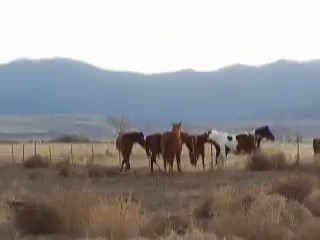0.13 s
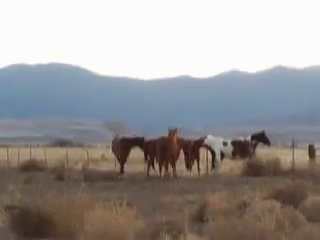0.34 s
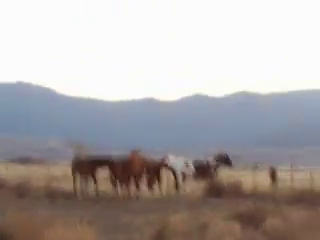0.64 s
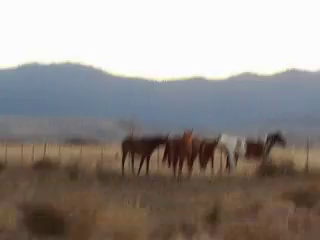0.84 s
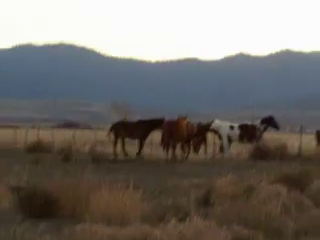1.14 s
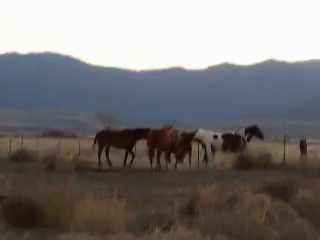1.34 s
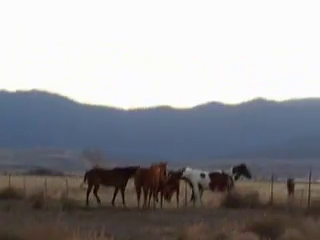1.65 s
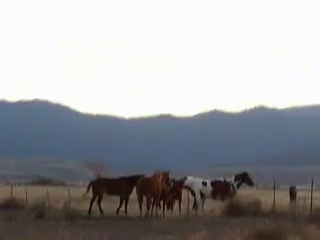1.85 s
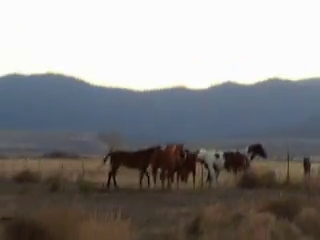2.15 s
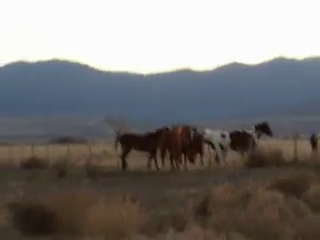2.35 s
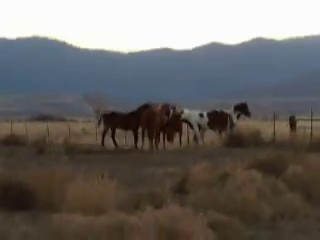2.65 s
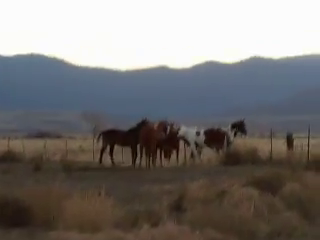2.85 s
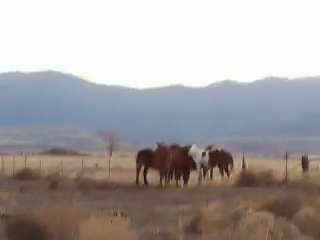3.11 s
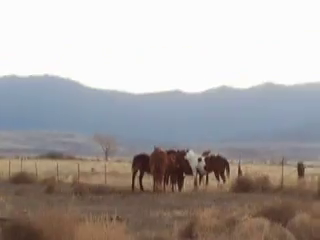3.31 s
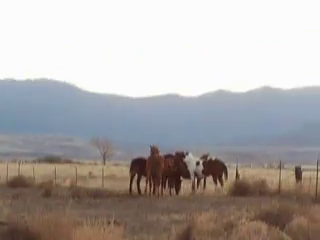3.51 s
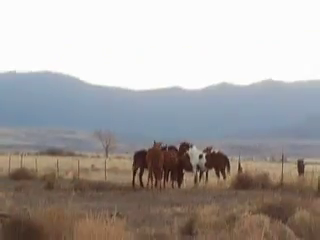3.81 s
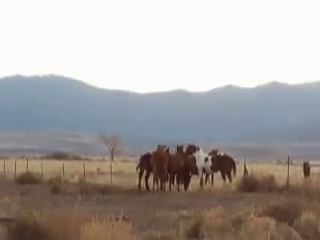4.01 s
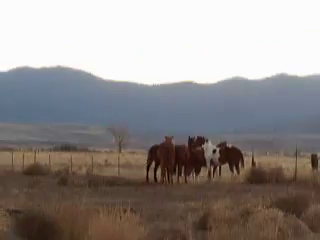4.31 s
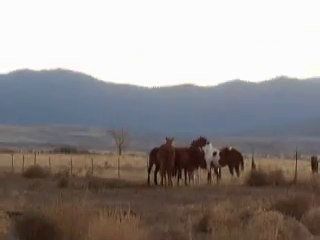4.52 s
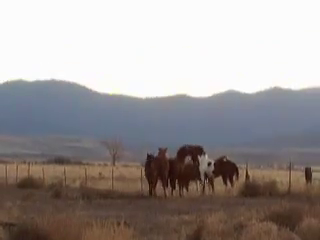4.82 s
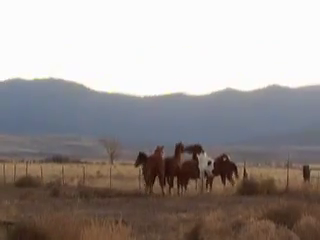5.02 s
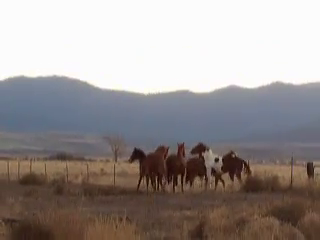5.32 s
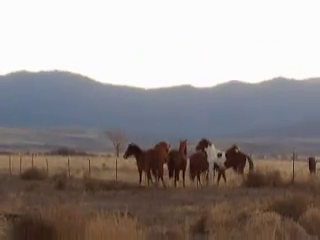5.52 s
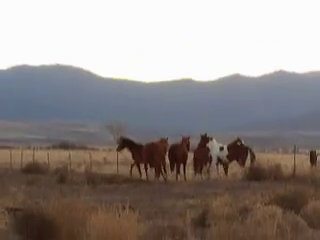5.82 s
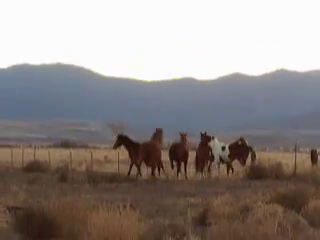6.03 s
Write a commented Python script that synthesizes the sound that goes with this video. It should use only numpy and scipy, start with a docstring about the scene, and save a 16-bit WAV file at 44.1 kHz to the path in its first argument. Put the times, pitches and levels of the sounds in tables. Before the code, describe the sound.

Close scraping and sharp plastic knocks from camera handling, followed by a brief raspy horse squeal far across an open field.

```python
"""Over the faint murmur of an open field, a hand bumps, rubs and knocks on a camera for three seconds,
right at its microphone; stick-slip friction and taps ring the plastic case. Then, far off, a horse
gives one short, high squeal: its voice tips into the octave, breaks into a rasp over a lower groan
and falls away, with a faint echo from the scrub. Light brushes and ticks go on close by."""
import sys
import numpy as np
from scipy import signal
from scipy.fft import rfft, irfft
from scipy.io import wavfile

SR = 44100
rng = np.random.default_rng(int(sys.argv[2]) if len(sys.argv) > 2 else 0)


def materialize(psi):
    """Save the field psi as 16-bit PCM at rate SR to the path in sys.argv[1].

    A 1-D psi becomes a single channel; in a 2-D psi each row is a channel.
    """
    bounded = np.clip(np.atleast_2d(psi).T, -1, 1)
    quanta = np.round(bounded * 32767).astype(np.int16)
    wavfile.write(sys.argv[1], SR, quanta)


N = 271607
TIME = np.arange(N) / SR
HZ = np.fft.rfftfreq(N, 1 / SR)


def gain_of(db):
    """Decibels to amplitude."""
    return 10 ** (np.asarray(db) / 20)


def unit_rms(x):
    """Scales to rms 1."""
    return x / np.sqrt(np.mean(x ** 2) + 1e-20)


def gain_at(spectrum, hz):
    """A spectrum's gain at hz, its points joined on a log axis."""
    f, db = np.transpose(spectrum)
    return gain_of(np.interp(np.log(hz + 1), np.log(f), db))


def coloured(x, gain):
    """Filters by a gain per frequency; rms 1."""
    return unit_rms(irfft(rfft(x) * gain, N))


def wander(hz):
    """Random motion of rms 1, up to about hz."""
    return coloured(rng.standard_normal(N), 1 / (1 + (HZ / hz) ** 4))


def add(mix, start_s, sound):
    """Mixes a sound in at start_s."""
    part = mix[round(start_s * SR):][:len(sound)]
    part += sound[:len(part)]


def resonate(x, hz, width_hz):
    """Two equal resonances in series that follow the curve hz."""
    turn = np.exp(2j * np.pi * np.cumsum(hz) / SR)
    decay = np.exp(-np.pi * width_hz / SR)
    for _ in range(2):
        x = 2 * (turn * signal.lfilter([1 - decay], [1, -decay], x / turn)).real
    return x


# Spectrum of the open field, far from the microphone: f/Hz, level/dB
AIR_SPECTRUM = [(12, -44), (20, -4), (65, -6), (153, -11), (183, -5.5), (290, -15), (623, -7),
                (1370, -16.5), (1560, -18), (1680, -18.5), (2590, -22), (4100, -20.5), (5030, -24),
                (7950, -26.5), (8800, -53), (11400, -58), (19400, -120)]

def air(murmur_db=-54.5, drone_db=-63.5, drone_hz=61.3, half_width_hz=7.6):
    """The distant murmur of the plain, wavering slightly, with a faint low drone."""
    murmur = coloured(rng.standard_normal(N), gain_at(AIR_SPECTRUM, HZ))
    murmur *= gain_of(0.91 * wander(hz=5.3))
    drone = coloured(rng.standard_normal(N), 1 / (1 + ((HZ - drone_hz) / half_width_hz) ** 2))
    return gain_of(murmur_db) * murmur + gain_of(drone_db) * drone


# Soft bumps of the hand on the body that holds the microphone: t/s, peak level/dB, f/Hz
BUMPS = [(0.049, -42, 176), (0.263, -40.5, 90), (0.285, -42, 160), (0.313, -38.5, 223), (0.343, -37, 110),
         (0.771, -42.5, 217), (0.967, -41, 199), (2.063, -37, 146), (3.059, -26, 66.5), (3.06, -37, 172),
         (5.158, -45.5, 196), (5.31, -48, 60), (5.715, -46.5, 160), (5.848, -39.5, 174),
         (5.893, -39.5, 130), (6.083, -45, 181)]

def bumps(rise_s=0.0033, sag=0.19, size=4096):
    """Heavily damped thuds of a few cycles whose pitch sags."""
    out = np.zeros(N)
    age = np.arange(size) / SR / rise_s  # in rise times
    for start_s, db, hz in BUMPS:
        cycles = np.cumsum(hz * (1 + sag * (np.exp(-age / 2) - .5))) / SR
        add(out, start_s, gain_of(db) * age * np.exp(1 - age) * np.sin(2 * np.pi * cycles))
    return out


def slips(per_s, spread_db):
    """Tiny stick-slip clicks of unequal size."""
    size = gain_of(spread_db * np.minimum(rng.exponential(1, N), 4))
    return size * rng.standard_normal(N) * (rng.random(N) < per_s / SR)


def stroke(start_s, length_s, db, change_db, attack_s, release_s=0.014, arch_db=2):
    """The gain of one stroke: tilted, and arched because the hand is fastest midway."""
    t = np.maximum(TIME - start_s, 0)
    progress = np.minimum(t / length_s, 1)
    hold_db = db + change_db * (progress - .5) + arch_db * (np.sin(np.pi * progress) - 2 / np.pi)
    release = np.exp(-np.clip((t - length_s) / release_s, 0, 20))
    return np.minimum(t / attack_s, 1) * gain_of(hold_db) * release


# Finger brushes beside the microphone: t/s, length/s, level/dB, change over the stroke/dB
BRUSHES = [(0.256, 0.07, -50, 12), (3.1, 0.17, -64, -9), (3.44, 0.15, -59, 0), (4.05, 0.34, -67, 0),
           (5.302, 0.42, -55, 3), (5.466, 0.21, -54, 5), (5.72, 0.44, -63.5, -9)]
# Spectrum of their hiss: f/Hz, level/dB
BRUSH_SPECTRUM = [(290, -48), (500, -15), (556, -27), (672, -3.5), (1130, -4.5), (1260, -3), (1470, -10),
                  (2030, 1.5), (2990, -8), (4120, 4), (4590, -5.5), (5960, -7.5), (8500, -45), (11000, -92),
                  (18700, -120)]

def brushing():
    """A finger barely touches the case: dense slips merge into a soft, fine hiss."""
    envelope = sum(stroke(*row, attack_s=0.053) for row in BRUSHES)
    return envelope * coloured(slips(per_s=9000, spread_db=1.5), gain_at(BRUSH_SPECTRUM, HZ))


def muffled(x, hz):
    """Dulls the knocks: little of their high treble comes through."""
    return signal.sosfilt(signal.butter(5, hz, fs=SR, output="sos"), x)


# Resonances of the case around the microphone: f/Hz, width/Hz, level/dB
CASE_MODES = [(665, 160, -14.5), (1400, 87, 7.5), (2260, 276, 17.5), (3150, 320, 0), (3700, 730, 10),
              (4820, 360, 1), (6070, 900, -16.5)]

def case_response(hz):
    """The plastic case: a sum of short-lived modes."""
    return sum(gain_of(db) * 1j * hz * width / (f * f - hz * hz + 1j * hz * width)
               for f, width, db in CASE_MODES)


# Knocks on the case, right at the microphone:
# t/s, ring peak level/dB, favoured f/Hz, ringing share (0-1), contact/s, push against the ring/dB
KNOCKS = [ (0.259, -36, 890, 0.04, 0.004, -23), (0.3111, -10, 2300, 0.55, 0.0025, -20),
          (0.3118, -17, 3700, 0.4, 0.0008, -42), (0.589, -24, 1980, 0.35, 0.0032, -14),
          (0.685, -20.5, 2000, 0.01, 0.0043, -20), (0.692, -28, 6070, 0.6, 0.00051, -39),
          (0.724, -18, 1100, 0.16, 0.0038, -20), (0.767, -12.5, 3600, 0.8, 0.0014, 4),
          (0.7712, -7, 1480, 0.2, 0.0036, 1), (0.7726, -12, 780, 0.15, 0.0028, -14),
          (0.836, -32, 1400, 0.04, 0.0012, -2), (0.905, -26, 1800, 0.3, 0.002, -16),
          (0.9656, -21.5, 700, 0.27, 0.0022, 6), (1.015, -22, 3500, 0.13, 0.0022, -3),
          (1.075, -16, 4300, 0.06, 0.0017, -11), (1.106, -27, 1600, 0.1, 0.0034, -16),
          (1.223, -31.5, 4000, 0.4, 0.002, -13), (1.5566, -22, 890, 0.34, 0.0035, -23),
          (1.557, -20, 3800, 0.37, 0.00093, -18), (1.8876, -13.5, 2700, 0.6, 0.0009, -38),
          (1.922, -19.5, 3300, 0.6, 0.0033, -14), (1.962, -23.5, 2300, 0.05, 0.0024, 3.5),
          (1.998, -34.5, 900, 0.4, 0.00087, 16), (2.0596, -13, 2000, 0.2, 0.006, 4),
          (2.0674, -12, 3400, 0.3, 0.005, -22), (2.07, -15.5, 700, 0.2, 0.0047, -12),
          (2.234, -25, 3000, 0.4, 0.002, -16), (2.428, -14.5, 2400, 0.01, 0.0033, -32),
          (2.836, -0.5, 3400, 0.7, 0.0006, -22), (2.865, -14, 2200, 0.9, 0.0016, -10),
          (2.969, -11, 3500, 0.6, 0.0044, -23), (2.974, -8.5, 3300, 0.6, 0.0037, -27),
          (3.0825, -10.5, 2180, 0.8, 0.0032, -27), (4.4466, -29, 7200, 0.2, 0.000094, -40),
          (5.013, -39, 2050, 0.9, 0.0016, -18), (5.741, -32, 3900, 0.8, 0.0037, -35),
          (5.907, -41.5, 2080, 0.8, 0.0008, -20)]

def knocks(spot_q=2.4, chatter=0.34, push_s=0.00035, size=4096):
    """Each knock chatters briefly, rings the modes that its spot favours and shoves the microphone."""
    out = np.zeros(N)
    t, hz = np.arange(size) / SR, np.fft.rfftfreq(size, 1 / SR)
    push = muffled((1 - t / push_s) * np.exp(-t / push_s), hz=4500)
    for start_s, db, spot_hz, ringing, contact_s, push_db in KNOCKS:
        force = (t == 0) + chatter * rng.standard_normal(size) * np.exp(-t / contact_s)
        spot = 1j * hz * spot_hz / (spot_q * (spot_hz ** 2 - hz ** 2) + 1j * hz * spot_hz)
        body = ringing * case_response(hz) + .5 * (1 - ringing)
        ring = muffled(irfft(rfft(force) * body * spot), hz=6300)
        add(out, start_s, gain_of(db) * (ring / abs(ring).max() + gain_of(push_db) * push))
    return out


# Hand strokes next to the microphone, long light drags with short firm ones on top:
# t/s, length/s, ring level/dB, change over the stroke/dB,
# then, against the ring, drag/dB, scratch/dB, hollow/dB; last, hollow f/Hz
STROKES = [ (0.31, 0.15, -41.5, 8.5, 0, -4.5, -2, 2280), (0.346, 0.13, -37, 3, -6, 3, -1, 2270),
           (0.459, 0.088, -23, 2.5, -13.5, -11, 2, 2150), (0.55, 0.52, -45.5, 0.5, 2, -2.5, 2.5, 2150),
           (0.632, 0.04, -41, -3, -1, -10, -2, 2050), (0.745, 0.16, -43.5, -11, 2, -3.5, 3, 2230),
           (0.898, 0.052, -37, -3.5, 2.5, -5.5, 2.5, 2070), (1.111, 0.069, -50.5, 2, 4.5, 1.5, 0.5, 2150),
           (1.214, 0.066, -54, -2, 1, 2.5, 1, 2200), (1.27, 0.265, -56.5, 3.5, -7.5, -0.5, -2, 2190),
           (1.365, 0.036, -52, 2, -1.5, 0.5, 5, 2090), (1.574, 0.025, -49.5, 5.5, -7, -1.5, 0, 2130),
           (1.663, 0.023, -50, -1, -10, -3, 1, 2100), (1.749, 0.12, -38.5, 8, -6.5, -2.5, 2, 2260),
           (1.797, 0.049, -33, 0, -14, 0, 4.5, 2340), (1.877, 0.054, -38, 0, 3, -5.5, 1.5, 2130),
           (1.94, 0.05, -44, -7, -1, -14, 0, 2090), (2.0, 0.055, -42, -4, -0.5, -4.5, 4, 2330),
           (2.054, 0.016, -29, 0, 3, -2, 0, 2300), (2.075, 0.09, -35, -1, -5, 0.5, 3.5, 2200),
           (2.17, 0.2634, -38, 4.5, -2.5, -1, 2.5, 2160), (2.229, 0.075, -25.5, 2.5, -9, -3, 3, 2090),
           (2.44, 0.52, -43, 3, -3, -7, -1.5, 2130), (2.508, 0.041, -31, -3, -9, -21, 0, 2080),
           (2.72, 0.11, -35, -1, -8, -5, 4, 2070), (2.608, 0.11, -31.5, 4, -6.5, -6.5, 4.5, 2140),
           (2.809, 0.093, -32.5, 0.5, -4, -2, 6.5, 2090), (2.962, 0.11, -25, -1, -12, -14, -2.5, 2160),
           (3.06, 0.074, -34.5, -3, -2.5, -3.5, 4.5, 2160)]
# Spectra of the ringing case, the dull drag and the fine scratch: f/Hz, level/dB
RING_SPECTRUM = [(900, -27), (1700, -9.5), (2650, -15.5), (2950, -2.5), (3150, -4.5), (3400, 0),
                 (3650, -0.5), (4000, -1.5), (4400, -10), (5200, -12.5), (6500, -31.5), (8500, -63.5)]
DRAG_SPECTRUM = [(30, -9.5), (150, -10.5), (250, -11), (470, -7.5), (650, 1.5), (820, 0.5), (1180, -3.5),
                 (1400, 2.5), (1650, -2), (2100, -7.5), (3000, -23.5), (6000, -55.5)]
SCRATCH_SPECTRUM = [(1000, -15.5), (3000, -1), (4100, -2), (4750, 5.5), (5300, 0), (5800, -3.5), (6600, -6),
                    (7400, -13.5), (8300, -31.5), (9000, -50)]

def rubbing(waver=0.018, uneven_db=1.5, let_go_s=3.137):
    """Friction rings the case and the hollow under the hand, drags on the microphone port, scratches."""
    power = np.array([stroke(*row[:4], attack_s=0.011) ** 2 for row in STROKES])
    drag_db, scratch_db, hollow_db, hollow_hz = np.transpose(STROKES)[4:]
    pitch = hollow_hz @ power / (power.sum(0) + 1e-20)  # the firmest stroke weighs most
    pitch *= 1 + waver * wander(hz=40)
    hollow = unit_rms(resonate(slips(per_s=7000, spread_db=0.5), pitch, width_hz=480))
    ring = coloured(slips(per_s=9000, spread_db=0.5), gain_at(RING_SPECTRUM, HZ))
    drag = coloured(slips(per_s=3000, spread_db=0.5), gain_at(DRAG_SPECTRUM, HZ))
    scratch = coloured(slips(per_s=5400, spread_db=1), gain_at(SCRATCH_SPECTRUM, HZ))
    friction = np.sqrt(power.sum(0)) * ring
    for layer, db in (hollow, hollow_db), (drag, drag_db), (scratch, scratch_db):
        friction += np.sqrt(gain_of(db) ** 2 @ power) * layer
    return friction * gain_of(uneven_db * wander(hz=60)) * (TIME < let_go_s)


# Slides that make the case sing, close up: t/s, length/s, f/Hz, width/Hz, level/dB
SLIDES = [(0.473, 0.11, 1740, 500, -33.5), (1.756, 0.11, 4520, 600, -30.5),
          (1.892, 0.045, 4000, 450, -38.5), (2.501, 0.067, 3700, 450, -30.5),
          (2.6, 0.057, 3580, 450, -31.5), (3.002, 0.082, 3150, 492, -26.5), (2.599, 0.4, 636, 109, -44),
          (2.621, 0.38, 1400, 200, -43), (2.964, 0.17, 1396, 200, -35.5), (2.966, 0.18, 690, 129, -44)]

def slides():
    """Fast, nearly regular slips give a fuzzy whistle that swells and fades."""
    out = np.zeros(N)
    for start_s, length_s, hz, width_hz, db in SLIDES:
        n = round(length_s * SR)
        whistle = unit_rms(resonate(rng.standard_normal(n), np.full(n, hz), width_hz))
        add(out, start_s, gain_of(db) * whistle * np.sin(np.linspace(0, np.pi, n)))
    return out


# The horse, far across the field. Its pitch leaps up, crests twice and falls away: t/s, f/Hz
SQUEAL_PITCH = [(4.43, 1270), (4.452, 1480), (4.474, 1590), (4.491, 1780), (4.545, 1733), (4.59, 1760),
                (4.635, 1655), (4.69, 1653), (4.738, 1828), (4.768, 1662), (4.845, 1588), (4.895, 987)]
# Its effort: t/s, level/dB
SQUEAL_EFFORT = [(4.43, -62), (4.447, -39), (4.495, -36.5), (4.535, -42.5), (4.58, -39), (4.67, -41.5),
                 (4.693, -47), (4.725, -42.5), (4.785, -46.5), (4.86, -52), (4.91, -70)]
# Response of its throat and mouth: f/Hz, level/dB
THROAT = [(200, -24), (350, -14.5), (700, -13.5), (1050, -10), (1350, -12.5), (1680, -4), (2000, -15),
          (2400, -7), (2850, -33), (3300, -5), (3600, 5), (4050, -1.5), (4500, -7), (5100, -15.5),
          (6300, -23), (8000, -51)]

def squeal(break_hz=1684, break_width_hz=14, flutter_hz=115, flutter_depth=.55):
    """A whistle-like voice tips into its octave at the crests, turns hoarse and flutters under strain."""
    hz = np.interp(TIME, *np.transpose(SQUEAL_PITCH))
    effort = gain_of(np.interp(TIME, *np.transpose(SQUEAL_EFFORT), left=-140, right=-140))
    hoarse = np.clip((TIME - 4.476) / 0.04, .05, 1)  # nearly pure until the upward leap
    strain = np.exp(-((TIME - 4.607) / 0.08) ** 4)  # swells and eases in mid-call
    tipped = .5 + .5 * np.tanh((hz - break_hz) / break_width_hz)
    fray = np.clip((TIME - 4.84) / 0.05, 0, 1)  # the voice loses its hold in the last fall
    jitter = .007 + .022 * strain + .03 * fray
    pitch = hz * (1 + jitter * wander(hz=450))
    phase = 2 * np.pi * np.cumsum(pitch) / SR
    odd = np.sin(phase) + gain_of(-2) * hoarse * gain_at(THROAT, 3 * pitch) * np.sin(3 * phase)
    even = np.sin(2 * phase) + gain_of(-31) * np.sin(4 * phase)
    # Above the break the even harmonics take over; the odd ones dip unless the voice is strained.
    odd *= gain_of(-13.5 * tipped * (1 - strain))
    even *= gain_of(-7) * hoarse * (1 - fray) * (1 - tipped) + gain_of(4) * tipped
    even *= gain_of(2.4 * wander(hz=70))
    breath = coloured(rng.standard_normal(N), gain_at(THROAT, HZ))
    rasp = hoarse * gain_of(-3 + 5 * strain) * breath
    flutter_rate = flutter_hz * (1 + 0.293 * wander(hz=50.2))
    flutter = 1 + flutter_depth * strain * np.sin(2 * np.pi * np.cumsum(flutter_rate) / SR)
    return effort * flutter * (np.sqrt(2) * (odd + even) + rasp)


def scrub_echo(call, echo_db=-17, t60_s=1.5, highpass_hz=2600):
    """The direct call plus a faint tail, mostly treble, scattered by scrub and uneven ground."""
    t = np.arange(SR) / SR
    tail = rng.standard_normal(SR) * gain_of(-60 * t / t60_s) * (t > .01)
    tail = signal.sosfilt(signal.butter(2, highpass_hz, "highpass", fs=SR, output="sos"), tail)
    return call + gain_of(echo_db) * signal.fftconvolve(call, tail / np.linalg.norm(tail))[:N]


def groan(start_s=4.55, length_s=0.145, db=-37.5, start_hz=468, rest_hz=305, sink_s=0.053):
    """At the squeal's height a lower voice swells and fades in the same throat, sinking in pitch."""
    t = np.clip(TIME - start_s, 0, length_s)
    hz = rest_hz + (start_hz - rest_hz) * np.exp(-t / sink_s)
    hz *= 1 + .022 * wander(hz=200)
    phase = 2 * np.pi * np.cumsum(hz) / SR
    voice = sum(gain_at(THROAT, k * hz) / k ** 0.53 * np.cos(k * phase) for k in range(1, 14))
    return gain_of(db) * np.sin(np.pi * t / length_s) ** 2 * unit_rms(voice)


def scene():
    """One hand-held microphone in an open field: handling close and dry, the horse far off."""
    ambience = air()
    handling = bumps() + brushing() + knocks() + rubbing() + slides()
    horse = scrub_echo(squeal() + groan())
    return (ambience + handling + horse)[None]


def record(dry, ceiling=.8, band_limit_hz=8800):
    """The microphone rounds off the hardest knocks; the camera cuts the high treble."""
    rounded = dry / (1 + (dry / ceiling) ** 6) ** (1 / 6)
    lowpass = signal.firwin(201, band_limit_hz, window=("kaiser", 9), fs=SR)
    return signal.oaconvolve(rounded, lowpass[None], "same")


dry = scene()
out = record(dry)
materialize(out)
```